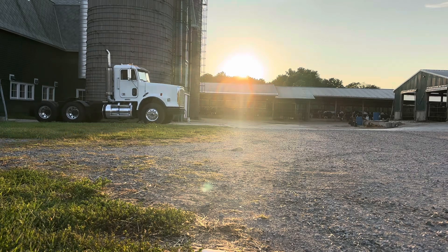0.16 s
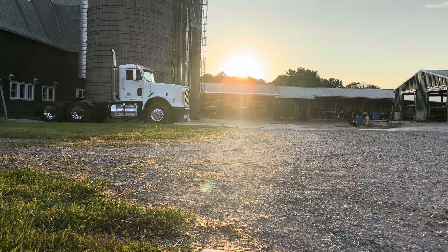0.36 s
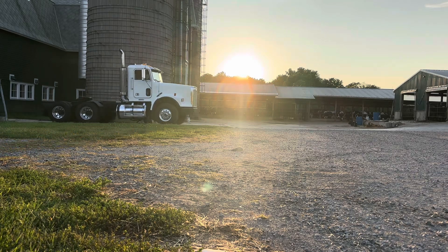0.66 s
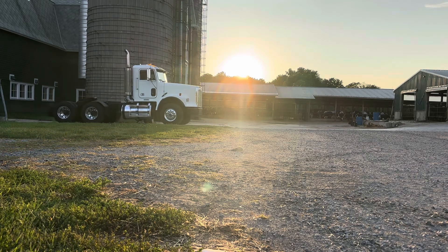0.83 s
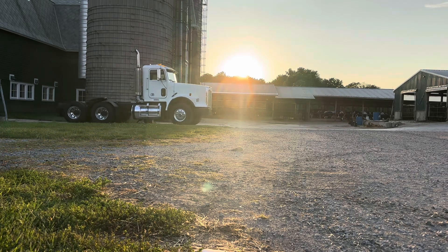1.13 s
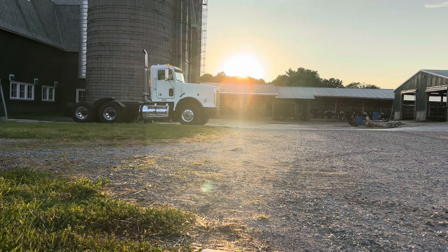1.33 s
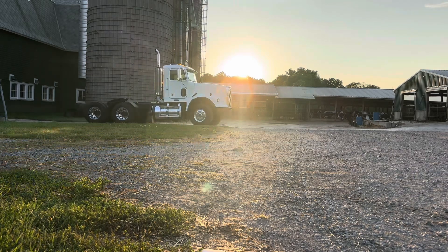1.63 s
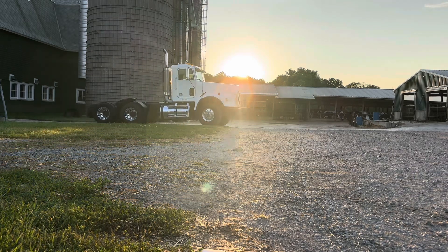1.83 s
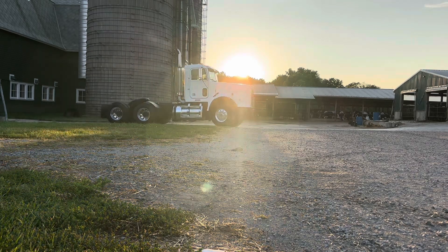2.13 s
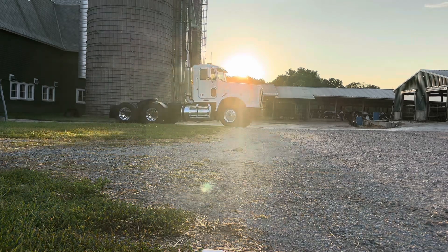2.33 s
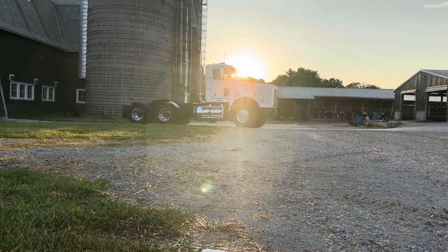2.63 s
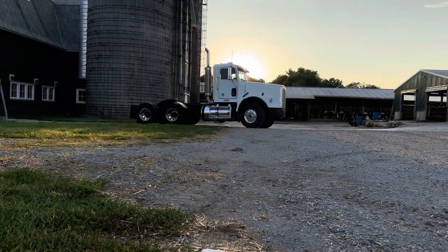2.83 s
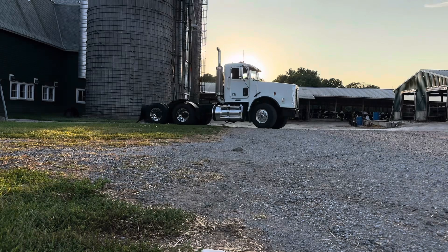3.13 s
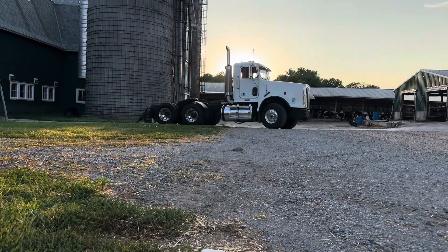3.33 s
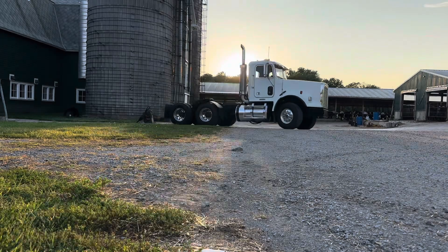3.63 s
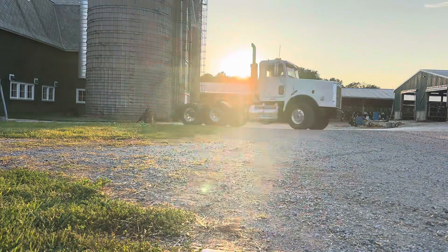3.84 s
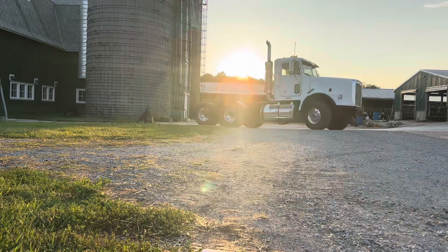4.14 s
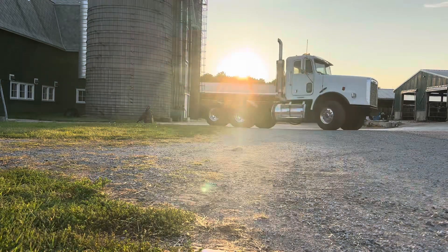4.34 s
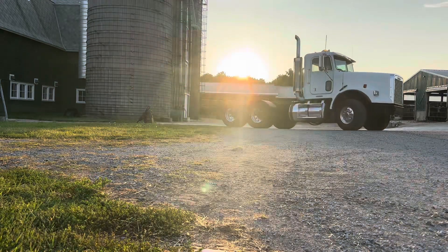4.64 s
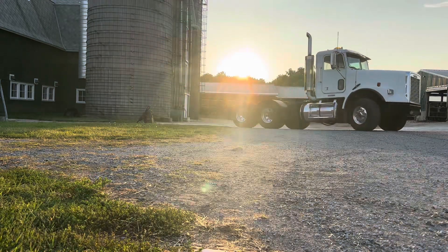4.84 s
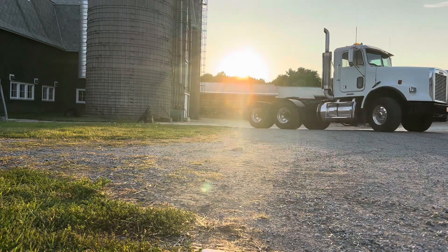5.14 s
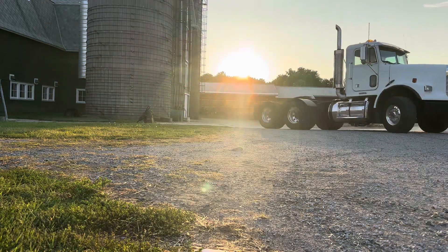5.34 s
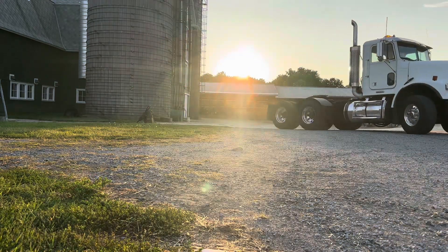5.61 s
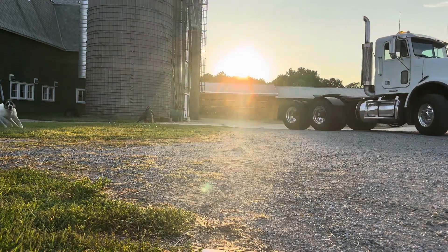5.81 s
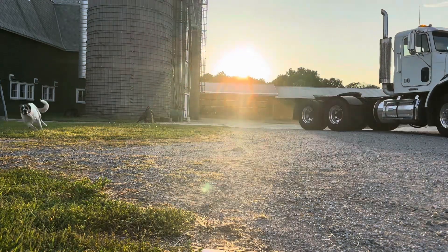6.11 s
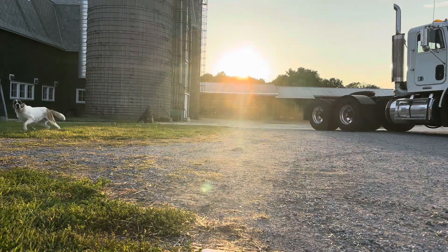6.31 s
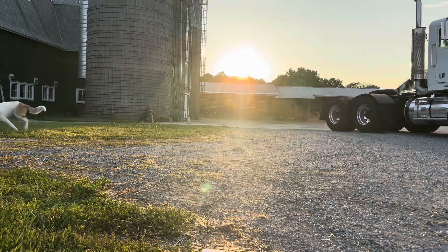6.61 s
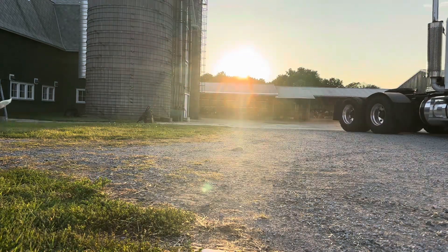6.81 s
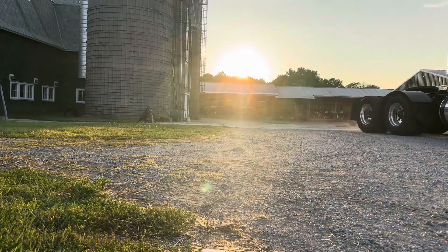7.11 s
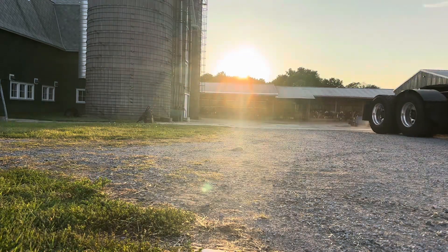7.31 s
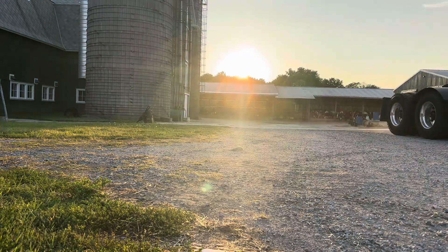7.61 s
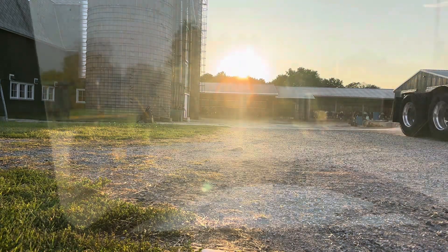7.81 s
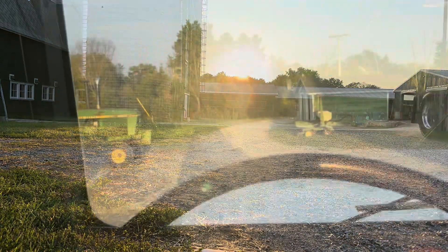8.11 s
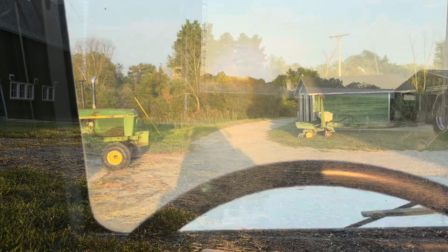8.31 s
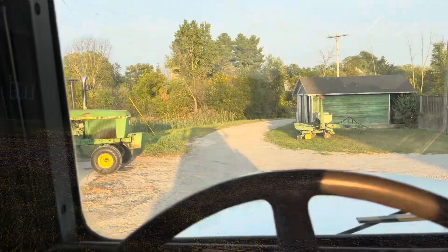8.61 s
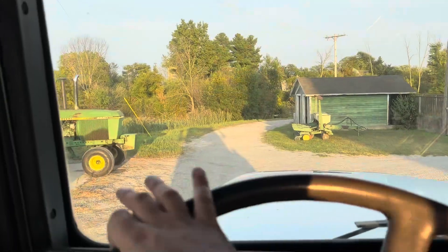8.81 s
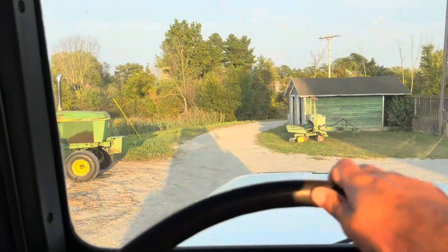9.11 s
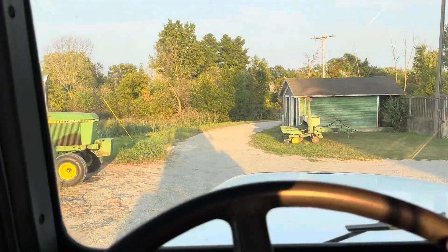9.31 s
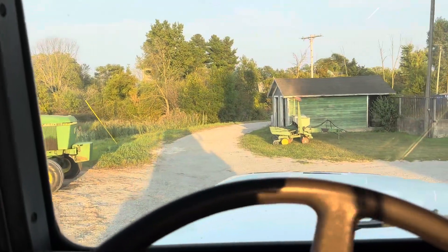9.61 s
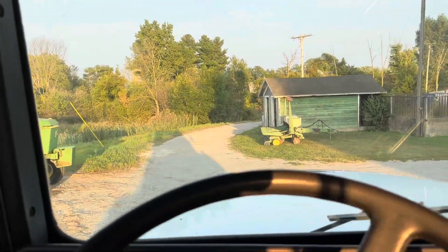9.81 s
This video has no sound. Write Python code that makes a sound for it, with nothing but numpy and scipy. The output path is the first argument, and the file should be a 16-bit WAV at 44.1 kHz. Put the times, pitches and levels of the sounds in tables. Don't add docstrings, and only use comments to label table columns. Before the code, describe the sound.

Outdoors in a farm yard, a large diesel truck pulls away from the left, its growl rising with a breathy turbo. It drops for a gear change with clunks and airy whistles, then pulls harder with rattling latches. It settles steady and loud, passing right with tyres crunching gravel. The sound fades across to the cab: low boom, dull knocking, vent hiss. A stereo microphone stays fixed in the yard, then sits inside.

```python
import sys
import numpy as np
from scipy import signal
from scipy.fft import rfft, irfft, next_fast_len
from scipy.io import wavfile

SR = 44100
rng = np.random.default_rng(int(sys.argv[2]) if len(sys.argv) > 2 else 0)


def how_loud(loudness_db):
    steps = np.asarray(loudness_db, float) / 20
    return 10 ** steps


def wav_record(signal):
    frames = np.transpose(np.atleast_2d(signal))
    bounded = np.clip(frames, -1, 1)
    quanta = np.round(bounded * 32767).astype(np.int16)
    wavfile.write(sys.argv[1], SR, quanta)


N = 438794
SLOW = 64

# [t/s, lag of left/samples, shadow on left/dB, side (negative left, positive right)]
BEARING = [(0, -9, 1, -1.8), (1.5, -9, -1, -1.1), (2.5, -5, -4.5, -0.5), (3.5, 5, -6.5, -0.3),
           (4.5, 10.5, -8.5, -0.14), (5.5, 14.5, -10.5, 0.62), (6.5, 17.5, -9.5, 0.78),
           (7.5, 26, -6.5, 0.58), (8.7, 25.5, -4, 0.64)]
# [t/s, share of fuel 0-1]
FUEL = [(1.82, 1), (1.86, 0), (2.575, 0), (2.59, 1)]
# [t/s, share 0-1]
SPOOL = [(.75, 0.15), (1.1, 0.95), (1.75, 0.6), (2.1, 0.01)]
# [t/s, share 0-1]
SHAKE = [(2.92, 0.27), (2.97, 0.74), (3.35, 0.72), (4.2, 0.68), (4.45, 0.25)]
# [f/Hz, level/dB, t60/s, gain as the truck turns its flank/dB]
RATTLE = [(3130, 0, .009, 0), (3930, -1, .007, 0)]
# [t/s, share 0-1]
PEDAL = [(9.33, 0.01), (9.61, 0.52), (9.94, 0.6)]


def in_time(rows):
    s, *columns = np.transpose(rows)
    return [np.interp(np.arange(N) / SR, s, c) for c in columns]


def at_hz(points, hz):
    table_hz, table_db = np.array(points).T[:2]
    return np.interp(np.log(hz), np.log(table_hz), table_db)


def rms_one(x):
    return x / np.sqrt(np.mean(x ** 2) + 1e-20)


def drift(rate_hz):
    r = np.exp(-2 * np.pi * rate_hz * SLOW / SR)
    noise = rng.standard_normal(N // SLOW + 2001)
    return rms_one(signal.lfilter([1], [1, -2 * r, r * r], noise)[2000:])


def fine(slow, step=1):
    return np.interp(np.arange(0, N, step) / SLOW, np.arange(len(slow)), slow)


def swells(rows, width_s, t):
    return sum(db * np.exp(-((t - s) / width_s) ** 2) for s, db in rows)


def ring(clicks, hz, t60):
    r, w = how_loud(-60 / (t60 * SR)), 2 * np.pi * hz / SR
    return signal.lfilter([0, np.sin(w)], [1, -2 * r * np.cos(w), r * r], clicks + 1e-18)


def butter(x, hz, kind, order=2):
    return signal.sosfilt(signal.butter(order, hz, kind, fs=SR, output="sos"), x)


def drone(cycles, firing_hz, orders, pipe, wobble_db, turned=0, nulls=(),
          lined_up=(6, 12, 18, 24, 30, 36), start_turns=-0.29, lean_turns=0):
    out, power, t = 0, 0, np.arange(0, N, SLOW) / SR
    lean = fine(lean_turns * (turned - .8) + 0 * t, 8)
    for k, level_db, *flank_db in orders:
        k = round(k)
        my_nulls = [(s, db) for s, order, db in nulls if round(order) == k]
        gain_db = level_db - swells(my_nulls, 0.059, t) + sum(flank_db) * turned
        gain_db = gain_db + at_hz(pipe, k * firing_hz[::SLOW] / 6)
        gain = how_loud(gain_db + wobble_db * drift(3.0))
        power += how_loud(2 * level_db) / 2
        start = rng.random() * (k not in lined_up) + start_turns
        out = out + fine(gain, 8) * np.sin(2 * np.pi * (k * cycles[::8] + start + lean))
    return butter(np.repeat(out, 8)[:N], 1300, "low", order=6) / np.sqrt(power)


def knock(cycles, modes, spread_db, rough_db, jitter, turned=0, count=36):
    angle = (np.arange(count) + rng.uniform(-.3, .3, count)) / count
    turns = (np.arange(int(cycles[-1]))[:, None] + angle).ravel()
    late = rng.normal(0, jitter, len(turns)).astype(int)
    at = np.clip(np.searchsorted(cycles, turns) + late, 0, N - 1)
    out = 0
    for hz, level_db, t60, flank_db in modes:
        habit = how_loud(spread_db * rng.standard_normal(count)) * rng.choice([-1, 1], count)
        chance = how_loud(np.broadcast_to(rough_db, N)[at] * rng.standard_normal(len(at)))
        clicks = np.zeros(N)
        clicks[at] = np.resize(habit, len(at)) * chance
        gain = fine(how_loud(level_db + flank_db * turned + drift(0.3)))
        out = out + gain * rms_one(ring(clicks, hz, t60))
    edges = [.75 * modes[0][0], 1.3 * modes[-1][0]]
    return rms_one(butter(out, edges, "band"))


def rush(cycles, zones_db, spectrum, gate, patchy_db, start=0):
    zones_hz = [150, 600, 2200, 6500, 14000]
    puff = 1 + np.clip(gate, 0, 1) * np.cos(12 * np.pi * cycles)
    white, out = rng.standard_normal((2, 2, N - start)), np.zeros((2, N))
    edges = 36 * 2 ** (np.arange(27.5) / 3)
    for k, (low, high) in enumerate(zip(edges, edges[1:])):
        hz = np.sqrt(low * high)
        share = [np.interp(np.log(hz), np.log(zones_hz), row) for row in np.eye(5)]
        level_db = np.dot(share, zones_db[:, ::SLOW]) + at_hz(spectrum, hz)
        level_db = level_db + patchy_db * drift(3.8) + 1.46 * (hz > 3500) * drift(14.6)
        gain = fine(how_loud(level_db) * np.sqrt(SR / 2 / (high - low)))
        out[:, start:] += gain[start:] * butter(white[k % 2], [low, high], "band")
    return out * puff


def yard_zones(firing_hz, fuel):
    # [t/s, level/dB]
    effort = [(0, -12.5), (0.3, -6), (0.9, -1), (1.7, 2.5), (1.85, -1), (2.57, -6.5), (2.62, -1), (2.7, 0),
              (2.9, 3.5), (2.97, 7), (3.7, 8), (4.15, 8.5), (4.48, 5.5), (5.78, 9.5), (6.55, 11),
              (7.8, 11.5)]
    # [level at cruise/dB, share of effort,
    # gain per octave of speed/dB, gain without fuel/dB, gain as the truck turns its flank/dB]
    laws = [(-20.5, 0.11, 6.5, -11, -1.17), (-29, 0.87, 0.6, -8.5, 0.3), (-44.5, 0.59, 7.5, -4, -3),
            (-55.5, 0.42, 6, 0.5, 1.3), (-62.5, 0.95, 7, 1.5, -2.5)]
    nose_on_db = [.1, .1, 0.18, 0.55, 4.1]
    cruise_hz, pull_air_db = 60, 6
    turned = in_time(BEARING)[-1]
    causes = [np.ones(N), *in_time(effort), np.log2(firing_hz / cruise_hz), 1 - fuel, turned]
    zones_db = np.array(laws) @ causes
    zones_db += np.outer(nose_on_db, 1 - np.minimum(abs(turned), 1))
    return zones_db + np.outer([0, 0, 0, 0, pull_air_db], in_time(SHAKE)[0])


def ports(truck):
    # [f/Hz, level against the sum/dB]
    flank = [(2000, -1.5), (2700, 2), (3300, 10), (4200, -0.5), (5300, 3), (6500, -4), (8300, -10),
             (10000, 6.5)]
    lag, shadow_db, bearing = in_time(BEARING)
    size = next_fast_len(N)
    hz, whole = np.arange(size // 2 + 1) * SR / size, rfft(truck, size)
    bass, treble = np.interp(hz, [200, 600], [1, 0]), np.interp(hz, [1700, 2200], [0, 1])
    quarter = -1j * treble * how_loud(at_hz(flank, hz + 1))
    hollow = np.exp(-((hz - 3180) / 300) ** 2)
    early = np.exp(-((hz - 3450) / 200) ** 2) * .5 + np.exp(-((hz - 6750) / 300) ** 2)
    parts = whole * [bass, 1 - bass - treble, treble, quarter, hollow, early]
    low, middle, high, differ, lost, far = irfft(parts, size)[:, :N]
    lost_share = np.clip(.72 + .17 * fine(drift(4)), 0, 1) * np.clip((lag - 11) / 9, 0, 1)
    far_share = np.clip(.55 + .3 * fine(drift(5)), 0, 1) * np.clip(-lag / 6, .4, 1)
    high = high - lost_share * lost - far_share * far

    def late(x, share):
        return np.interp(np.arange(N) - share * lag, np.arange(N), x)

    left = late(low, 0.94) + how_loud(.5 * shadow_db) * late(middle, 0.79) + high + bearing * differ
    right = low + how_loud(-.3 * shadow_db) * middle + high - bearing * differ
    return left, right


def beams(cycles):
    # [multiple of the cycle,
    # rms level/dB, t/s, spread/s]
    tones = [(35, -37, 4.27, 1), (39, -37, 5.67, 0.67), (39, -32.5, 6.93, 0.42), (42, -40.5, 7, 0.68),
             (44, -38, 6.04, 0.36), (51, -50, 6.8, 0.4), (52, -35, 5.1, .4), (61, -36, 6.76, 0.69),
             (58, -41, 6.37, 0.15), (35, -41.5, 6.34, 0.48), (53, -42, 5.2, 0.39), (54, -35.5, 6.5, 0.32),
             (55, -37.5, 8.5, 0.65), (56, -29.5, 7.33, .4), (57, -26.5, 6.54, 0.5), (58, -36, 6.16, 0.47),
             (62, -35.5, 5.63, 0.3), (64, -32, 6.1, 0.62), (65.4, -36.5, 5.55, 0.5), (65.8, -42, 11, 0.29),
             (72.3, -35.5, 6, 1), (74.85, -44, 6.1, .7), (77.1, -38, 6.1, 0.26), (77.2, -29, 6.7, 0.45),
             (84.2, -37, 8.4, 0.46), (145.8, -44, 7.9, .3), (146, -40, 8, 0.21), (84, -45, 5.8, 0.33),
             (86.54, -32.5, 5.45, 0.52), (69.6, -30, 3.9, .08), (72.4, -37, 2.9, 0.046),
             (58.5, -37, 3.6, 0.041), (58, -36, 4.5, .06), (50.8, -40, 4.4, 0.025),
             (89.2, -35.5, 3.1, 0.088), (85.6, -32, 3.9, 0.1), (78.4, -29.5, 3.72, 0.12),
             (72.5, -32, 3.88, 0.093), (80.8, -34, 4.36, 0.056), (65, -34, 3.7, 0.091),
             (33, -38.5, 4.2, 0.11), (57, -34, 3.68, .06), (55, -33.5, 3.8, 0.042), (39, -36, 3.55, 0.075)]
    t, out = np.arange(0, N, SLOW) / SR, 0
    for k, level_db, s, spread_s in tones:
        gain = how_loud(level_db + 6 + 0.52 * drift(1.1)) * np.exp(-((t - s) / spread_s) ** 2 / 2)
        out = out + fine(gain, 8) * np.sin(2 * np.pi * (round(k) * cycles[::8] + rng.random()))
    return butter(np.repeat(out, 8)[:N], 2000, "low", order=6)


def turbo():
    air = rng.standard_normal(N)
    breath = butter(air, [5650, 6350], "band") + butter(air, [7200, 8300], "band")
    return how_loud(-51.5) * in_time(SPOOL)[0] * rms_one(breath)


def whistles(fuel):
    # [f at lift-off/Hz, f at re-entry/Hz, width/Hz, level/dB]
    bands = [(2060, 1900, 90, -45), (3250, 3000, 180, -46), (4480, 4200, 70, -53), (960, 880, 40, -48),
             (2750, 2600, 220, -49), (3600, 3350, 150, -51), (2350, 2200, 200, -51)]
    t, out = np.arange(N) / SR, 0
    coast = [FUEL[1][0], FUEL[2][0]]
    for start_hz, end_hz, width_hz, level_db in bands:
        turn = 2 * np.pi * np.cumsum(np.interp(t, coast, [start_hz, end_hz])) / SR
        tone = fine(.5 + drift(width_hz)) * np.sin(turn) + fine(drift(width_hz)) * np.cos(turn)
        out = out + how_loud(level_db) * tone
    return out * (1 - fuel) * how_loud(np.interp(t, [coast[0], 1.98, coast[1]], [-9, -2, -8]))


def clunks():
    # [t/s, peak level/dB, f/Hz, t60/s]
    hits = [
        (2.141, -28, 900, .04),
        (2.136, -28, 1600, 0.07),
        (2.141, -33, 2600, .04),
        (2.587, -31, 950, 0.087),
        (8.447, -27, 1450, .025),
        (8.447, -21, 2050, 0.045),
        (8.447, -35, 5500, .08),
        (8.457, -30, 2300, .1),
        (9.252, -22, 700, .03),
    ]
    out, t = np.zeros(N), np.arange(4410) / SR
    for s, peak_db, hz, t60 in hits:
        i = round(s * SR)
        burst = butter(rng.standard_normal(len(t)), [hz / 1.5, hz * 1.4], "band", order=3)
        out[i:i + len(t)] += how_loud(peak_db) * rms_one(burst) * how_loud(-60 * t / t60) / 2
    return out


def first_blows():
    # [t/s, peak level/dB, f/Hz]
    strikes = [(2.586, -27.5, 992), (2.617, -27, 995), (2.636, -22, 750), (2.652, -26, 950),
               (2.679, -19.5, 890), (2.708, -26, 630.5), (2.724, -22, 930), (2.74, -21, 1000)]
    out, t = np.zeros(N), np.arange(4410) / SR
    for s, peak_db, hz in strikes:
        i = round(s * SR)
        decay = how_loud(peak_db - 60 * t / 0.088)
        out[i:i + len(t)] += decay * np.minimum(t / .002, 1) * np.sin(2 * np.pi * hz * t)
    return out


def latches(cycles):
    # [t/s, level/dB]
    fits_of_latch = [
        [(2.99, 6.5), (3.09, 5), (3.21, 9), (3.3, 7), (3.37, 10.5), (3.47, 6), (3.59, 4), (3.68, 5.5),
         (3.83, 0), (4.02, 3.5), (4.14, -6)],
        [(2.95, 9), (3.13, 8), (3.3, 7), (3.38, 5), (3.52, 8.5), (3.64, 4.5), (3.92, 5.5), (4.08, 1),
         (4.18, 3.5)],
    ]
    t, out = np.arange(N) / SR, 0
    for mode, fits in zip(RATTLE, fits_of_latch):
        chatter = knock(cycles, [mode], spread_db=4.0, rough_db=2.0, jitter=6, count=48)
        out = out + how_loud(swells(fits, 0.031, t)) * chatter
    return out


def gravel():
    # [t/s, share 0-1]
    roll_by = [(6.3, 0.03), (7.3, 0.57), (7.7, 0.94)]
    grains_per_s = 5000
    sizes = how_loud(2.0 * np.minimum(rng.exponential(1, N), 4)) * rng.choice([-1, 1], N)
    grains = butter(sizes * (rng.random(N) < grains_per_s / SR), [3200, 5150], "band")
    return how_loud(-39.5) * in_time(roll_by)[0] * rms_one(grains)


def yard():
    # [t/s, f/Hz]
    speed = [(0.15, 42), (0.69, 48.04), (1.09, 59.95), (1.3, 66), (1.81, 75.8), (2.22, 59.32), (2.6, 43.26),
             (3.04, 55.26), (3.48, 61.94), (4.11, 77.96), (4.28, 74.1), (4.52, 71.4), (4.88, 70.38),
             (5.12, 68.88), (6.23, 67.19), (6.82, 68.59), (7.8, 69.76), (9.4, 71.23)]
    # [multiple of the four-stroke cycle, level/dB, gain as the truck turns its flank/dB]
    orders = [(4, -20, -1), (5, -26.5, 0), (6, 2.5, 0.5), (7, -22, 10), (8, -20, 3.5), (9, -11, 1),
              (10, -10, 2), (11, -19.5, 1.5), (12, 2.5, 1.4), (13, -20, -4), (14, -16.5, 2), (15, -20, 2),
              (16, -6.5, 2.5), (17, -18.5, 0), (18, -8, 2), (19, -18, -1), (20, -18.5, -2),
              (21, -19.5, -3.5), (22, -19, -0.5), (23, -14, 4), (24, -11.5, 7), (25, -24.5, -7.5),
              (26, -19.5, 2.5), (27, -23, -3.5), (28, -24, 4), (29, -22, 7.5), (30, -19, 6),
              (32, -24.5, -3), (33, -18, 2.5), (35, -21, -2.5), (42, -16, 2), (44, -22, -1.5)]
    # [f/Hz, level/dB]
    stack = [(30, -26), (45, 0.5), (70, 0), (100, -2), (140, 1), (175, -0.5), (215, 6), (260, -1),
             (330, -4.5), (500, -3)]
    # [t/s, order, loss/dB]
    nulls = [(.52, 12, 10), (.86, 12, 3), (1.12, 12, 1), (1.4, 12, 8.5), (3.06, 12, 3), (3.35, 12, 8.5),
             (3.72, 12, 6.5), (4.13, 12, 8), (4.87, 12, -1.5), (5.7, 12, 0), (5.8, 12, -1.5), (5.9, 12, -3),
             (6, 12, -2), (6.1, 12, -2), (8.1, 12, 4), (8.3, 12, 9), (1.95, 12, 8), (1.95, 6, 7),
             (.95, 6, 2), (1.46, 6, 6), (3.7, 6, 2), (.95, 18, 12), (1.35, 18, 1), (2.95, 18, 21),
             (3.35, 18, 5), (4.85, 18, 8), (4.1, 18, 1), (7.95, 18, 2), (8.05, 18, 13.5), (8.15, 18, 22),
             (8.25, 18, 14), (8.35, 18, 12), (8.45, 18, 12), (8.55, 18, 13)]
    # [f/Hz, level/dB, t60/s, gain as the truck turns its flank/dB]
    block = [(406.3, -5.5, 0.15, -4.5), (448, -8.5, 0.17, 3), (480, -23, 0.085, 6), (585, -6, 0.062, 3),
             (645, -2, 0.14, 0.5), (700, -7.5, 0.06, -1.5), (781, -3.5, 0.093, 0.5),
             (838.5, -6, 0.091, 0.5), (899.6, -0.5, 0.11, 0), (982.5, -2.5, 0.11, 0), (1126, -1, 0.0022, 6)]
    # [f/Hz, level/dB, t60/s, gain as the truck turns its flank/dB]
    clatter = [(1527, 12.5, 0.019, 19.5), (1697, 14.5, 0.093, 9), (1990, -7.5, 0.032, -12.5),
               (2460, 4, 0.013, 11), (3140, 10.5, 0.0079, 1.5), (3870, -20, 0.039, 4),
               (4660, -42, .02, 2.5)]
    # [f/Hz, third-octave level/dB]
    air = [(40, -25.5), (100, -23.5), (200, -21.5), (310, -20.5), (450, -12.5), (900, -10), (1250, -4),
           (1700, -1), (2300, -9.5), (3800, -4.5), (5200, -3), (6600, -4.5), (9000, -6.5), (14000, -16)]
    # [t/s, level/dB]
    settle = [(4.9, -2.5), (5.5, -4), (6.5, -4.5), (7.6, -1.5), (8.2, -1.5)]
    # [t/s, share 0-1]
    steadiness = [(4.5, 0), (5.5, 1)]
    firing_hz, = in_time(speed)
    fuel, = in_time(FUEL)
    steady, = in_time(steadiness)
    turned = in_time(BEARING)[-1][::SLOW]
    cycles, zones_db = np.cumsum(firing_hz) / 6 / SR, yard_zones(firing_hz, fuel)

    air_db = np.outer([16.0, 7.5, -8.5, 1.2, 2.0], 1 - fuel) - np.outer([5, 8, 3, 0, 0], steady)
    direct, scattered = rush(cycles, zones_db + air_db, air, gate=0.097, patchy_db=0.5)
    growl = drone(cycles, firing_hz, orders, stack, wobble_db=0.94, turned=turned, nulls=nulls,
                  lined_up=(6, 10, 12, 16, 18, 24), start_turns=-.17, lean_turns=.1)
    blows = knock(cycles, block, spread_db=3, rough_db=4 - 3 * steady, jitter=1, turned=turned)
    ticks = knock(cycles, clatter, spread_db=2.5, rough_db=3, jitter=3, turned=turned)

    truck = how_loud(zones_db[0] - 1.7 * (1 - fuel)) * growl
    truck += how_loud(zones_db[1] - 1.5 + 2.6 * fuel + in_time(settle)[0]) * blows
    truck += how_loud(zones_db[2] + 4.0 + 2.5 * in_time(SPOOL)[0]) * ticks
    truck += beams(cycles) + turbo() + first_blows() + gravel()
    truck += how_loud(zones_db[2] - 5.5) * in_time(SHAKE)[0] * latches(cycles)
    left, right = ports(truck + direct + whistles(fuel) + clunks())

    side = how_loud(-20.0) * butter(scattered, 180, "high") + how_loud(-10.0) * scattered
    side += how_loud(-5) * butter(scattered, [3800, 7500], "band")
    return np.array([left + side, right - side])


def cab_zones():
    # [level at idle/dB, gain at full pedal/dB]
    laws = [(-21, 6), (-37, 14), (-53, 12.5), (-48, -4), (-45.5, -5.5)]
    # [t/s, level/dB]
    ruts = [(8.81, 3), (8.89, 2), (9.55, 3), (9.7, 4), (9.93, 3)]
    zones_db = np.array(laws) @ [np.ones(N), *in_time(PEDAL)]
    ruts_db = swells(ruts, 0.018, np.arange(N) / SR)
    return zones_db + np.outer([1, 0, 0, 0, 0], ruts_db)


def cab():
    # [t/s, f/Hz]
    speed = [(7.9, 44.76), (8.25, 45), (8.35, 43.34), (9.47, 43.6), (9.68, 48.4), (9.82, 48.9), (9.95, 51)]
    # [multiple of the four-stroke cycle, level/dB]
    orders = [(3, -25), (6, -0.5), (8, -18), (9, -13), (10, -6), (11, -22), (12, 3), (13, -24), (14, -33),
              (15, -10), (16, -17), (18, 0.5), (20, -5.5), (21, -33), (24, -4), (27, -14), (30, -20.5),
              (36, -30), (39, -23)]
    # [f/Hz, level/dB]
    panels = [(20, -10), (45, 4), (70, -5), (88, -1), (103, -0.5), (130, 1), (150, -11), (190, -10.5),
              (260, 4)]
    # [f/Hz, level/dB, t60/s, gain as the truck turns its flank/dB]
    block = [(289, -18, 0.12, 0), (418, -8, 0.3, 0), (573, 4.5, 0.048, 0), (594, -1.5, 0.089, 0),
             (706, 5, 0.057, 0), (763, 2.5, 0.16, 0), (949, 7, 0.064, 0), (1498, -5, 0.031, 0)]
    # [f/Hz, third-octave level/dB]
    air = [(40, -26), (90, -7.5), (140, -15.5), (220, -27.5), (400, -14), (900, -2.5), (1300, -3.5),
           (2000, -2), (3500, -7.5), (5500, -2.5), (8000, -10), (11000, -6), (13800, -9), (15500, -4.5)]
    firing_hz, = in_time(speed)
    cycles, zones_db = np.cumsum(firing_hz) / 6 / SR, cab_zones()
    mid, side = rush(cycles, zones_db, air, gate=0.13, patchy_db=1.0, start=7 * SR)
    mid += how_loud(zones_db[0] - 1.5) * drone(cycles, firing_hz, orders, panels, wobble_db=1.8)
    mid += how_loud(zones_db[1] + 1.0) * knock(cycles, block, spread_db=0.5, rough_db=1.0, jitter=0.5)
    rattle = knock(cycles, RATTLE[1:], spread_db=1, rough_db=2, jitter=30, count=96)
    mid += how_loud(-46.0 + 1.5 * fine(drift(9.0))) * in_time(PEDAL)[0] * rattle
    side = how_loud(-0.5) * butter(side, 230, "high")
    panel_knock = knock(cycles, block, spread_db=10.5, rough_db=2.0, jitter=3.4)
    side += how_loud(zones_db[1] + 10.5) * butter(panel_knock, 850, "high")
    left, right = (mid + side) * how_loud(1.5), mid - side
    right -= butter(right, [4200, 7500], "band", order=1)
    return np.array([left, right])


def scene():
    # [t/s, yard share, cab share]
    dissolve = [
        (7.75, 1, 0),
        (8.1, .72, .55),
        (8.4, .4, .85),
        (8.75, 0, 1),
    ]
    yard_share, cab_share = in_time(dissolve)
    return yard_share * yard() + cab_share * (cab() + clunks())


def band_limit(x):
    return signal.sosfilt(signal.butter(12, 15790, fs=SR, output="sos"), x)


def record(dry):
    # [f/Hz, half turns between left and right]
    port_phase = [(8600, 0), (9700, .4), (10500, 1), (12500, 1), (13400, 2)]
    size = next_fast_len(N)
    left, right = rfft(butter(dry, 48.6, "high", order=3), size)
    hz = np.arange(len(left)) * SR / size
    turn = np.exp(.5j * np.pi * np.interp(hz, *np.transpose(port_phase)))
    merged = np.clip((hz - 7200) / 2800, 0, 1)
    pair = [(1 - merged) * left + merged * right * turn, (1 - merged) * right + merged * right / turn]
    return band_limit(irfft(np.array(pair), size)[:, :N])


dry = scene()
out = record(dry)
wav_record(out)
```